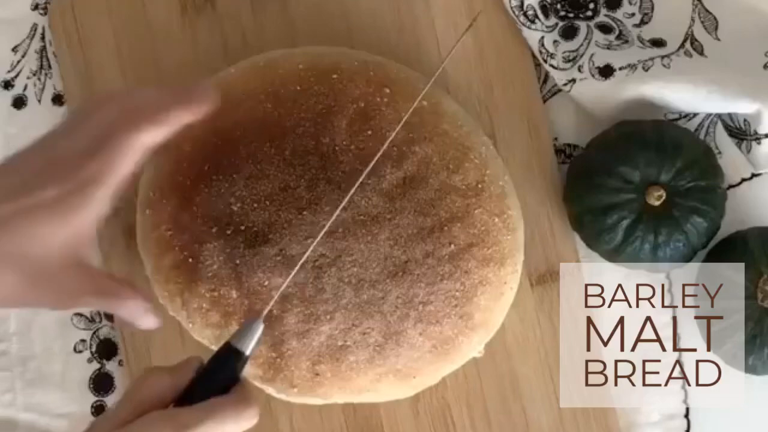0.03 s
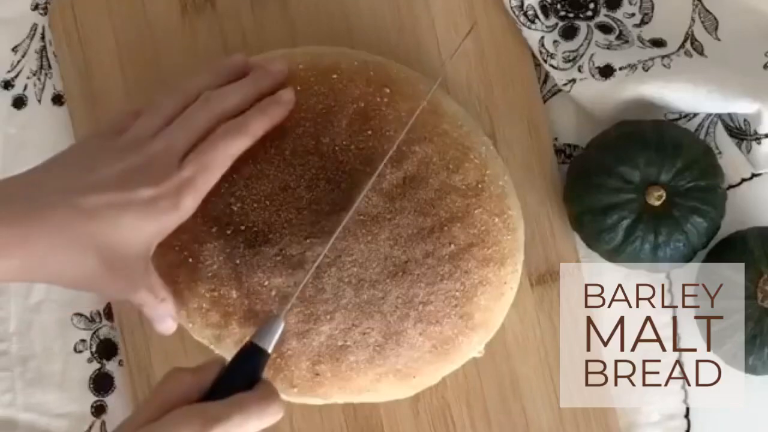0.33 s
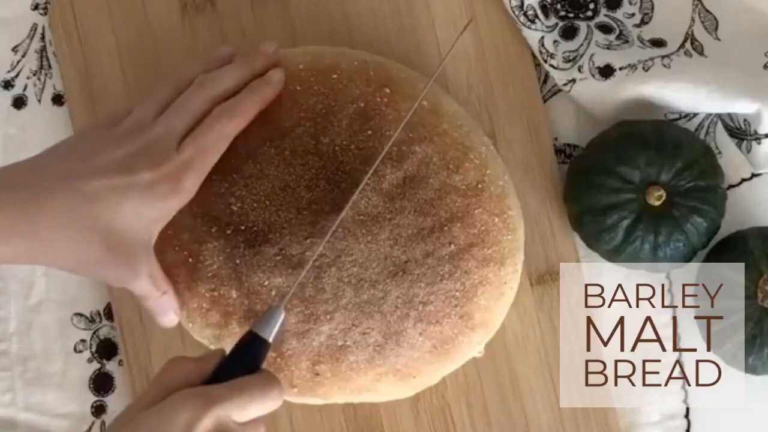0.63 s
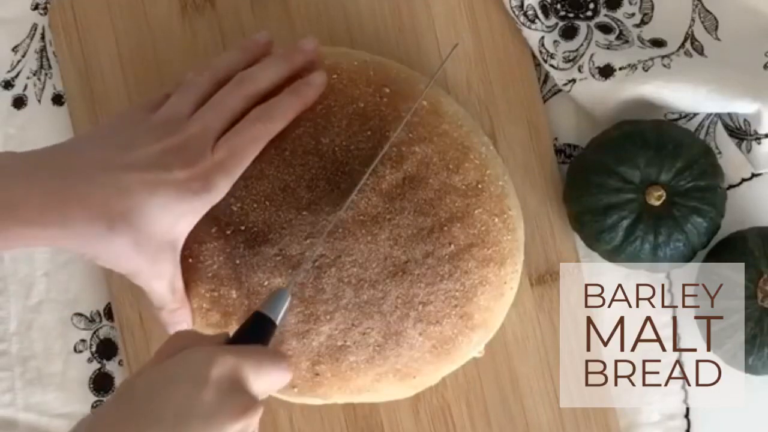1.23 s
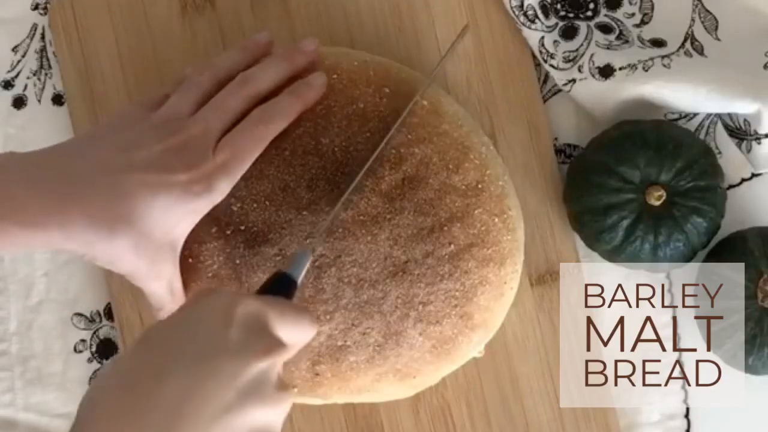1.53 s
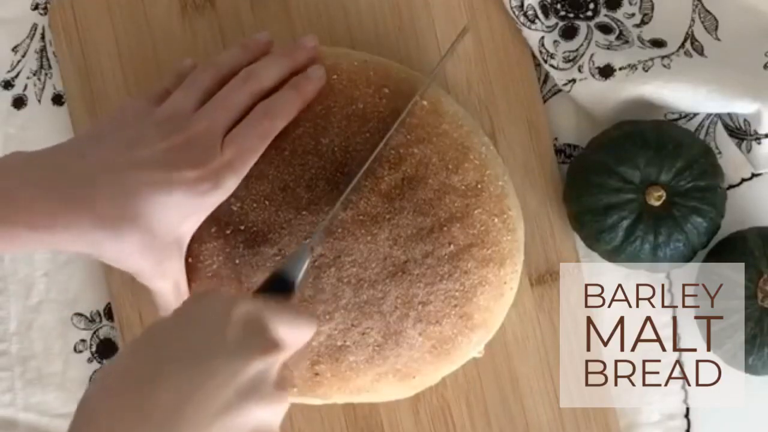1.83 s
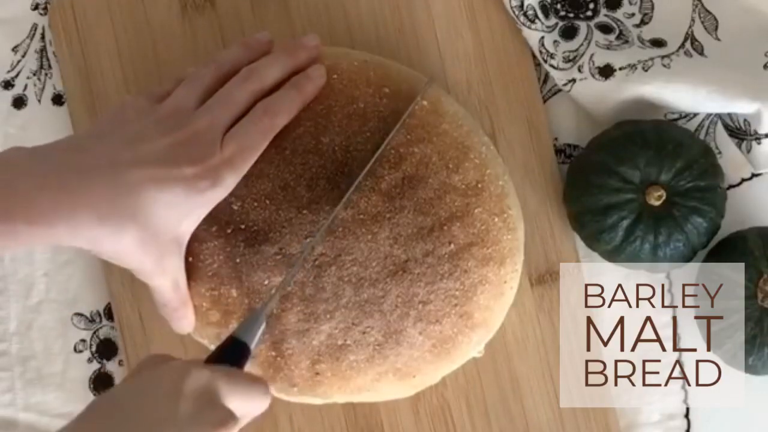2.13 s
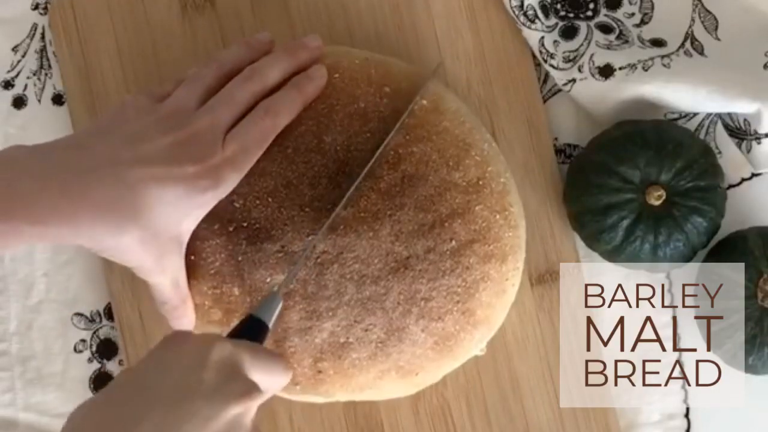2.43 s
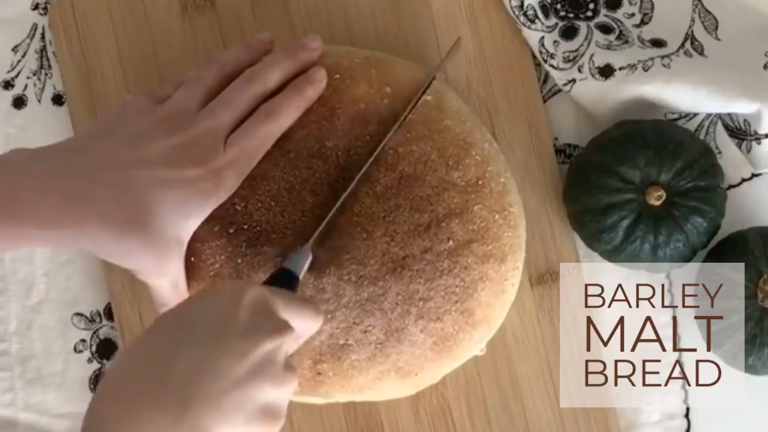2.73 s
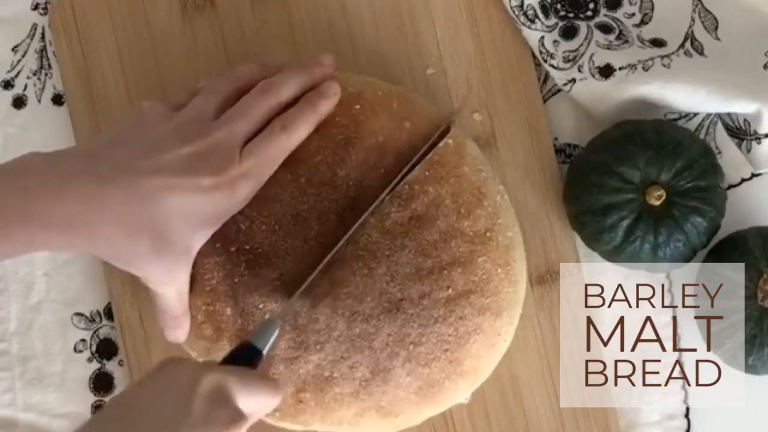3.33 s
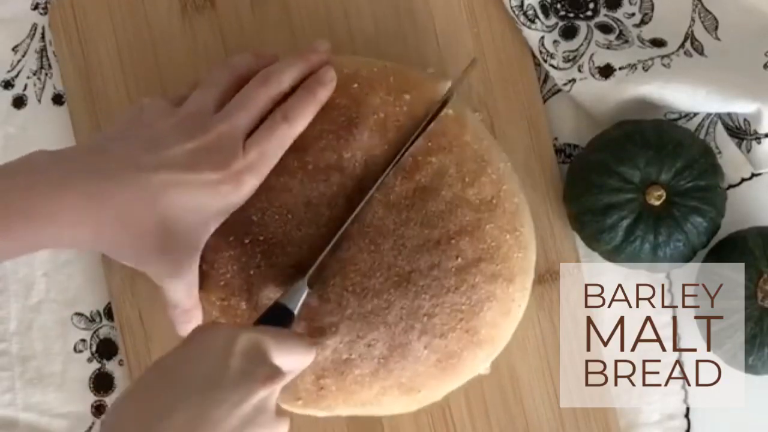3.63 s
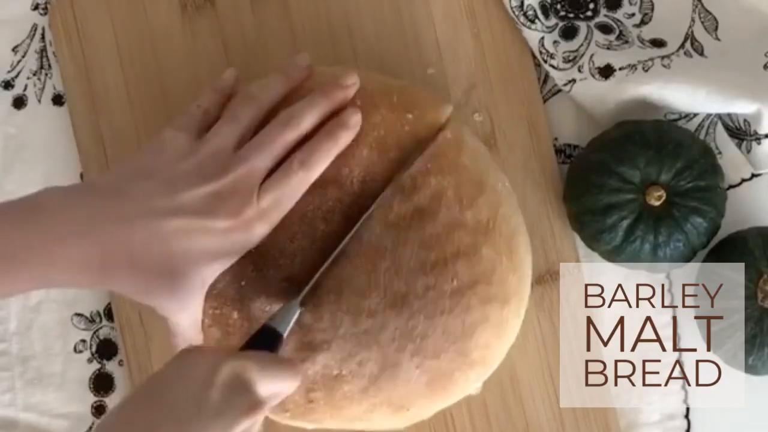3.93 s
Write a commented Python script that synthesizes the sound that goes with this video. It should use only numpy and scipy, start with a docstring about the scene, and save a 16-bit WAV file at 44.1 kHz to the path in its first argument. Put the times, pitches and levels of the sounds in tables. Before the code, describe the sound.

Close sawing of crusty bread in a quiet room starts with soft taps and scraping. The knife then rasps back and forth, snapping flakes of crust, while the loaf rumbles and knocks on the wooden board.

```python
"""A serrated knife saws a crusty round loaf on a wooden board in a quiet kitchen.
After a soft scrape, three pushes and three pulls grind the crust by brittle fracture: dense tiny cracks,
coarser crunches and the snaps of larger flakes. Stick-slip friction makes the blade groan in the first push.
Hand and blade tap the crust; the teeth tug the loaf, which rumbles and bumps the board.
The board rings in its normal modes, and a short reverberation follows over faint air noise."""
import sys
import numpy as np
from scipy import signal
from scipy.fft import rfft, irfft
from scipy.io import wavfile
from scipy.ndimage import uniform_filter1d

SR = 44100
rng = np.random.default_rng(int(sys.argv[2]) if len(sys.argv) > 2 else 0)


def put_to_file(sound):
    """Save the sound as 16-bit audio at rate SR, in the file named by the first command-line argument."""
    columns = np.atleast_2d(sound).T  # one column per channel
    safe = np.clip(columns, -1, 1)
    whole_steps = np.round(safe * 32767)
    wavfile.write(sys.argv[1], SR, whole_steps.astype(np.int16))


N = 176400

# Spectrum of the loaf shaken against the board. Each row: frequency in Hz, relative level in dB.
LOAF_SPECTRUM = [(30, -45.5), (65, -29.5), (90, -2), (115, -11), (150, -0.5), (210, 1), (280, -2.5),
                 (360, -8), (480, -19.5), (900, -21), (3000, -90)]
# Modes of the board and table, lowest first. Each row: frequency in Hz, gain in dB, T60 in seconds.
BOARD_MODES = [(90.9, 1.5, 0.55), (142.1, 8.5, 1), (343.6, 2, 0.61), (534, 6.5, 1), (657, 4, 0.22),
               (915, 0.5, 0.53), (1084, -6, 0.14), (1540, -6, 0.17), (1624, -1, 0.77)]
CATCH_HZ = 56.8  # bandwidth of the blade's uneven catching and slipping


def from_db(db):
    """Decibels to amplitude ratio."""
    return 10 ** (np.asarray(db) / 20)


def unit_rms(x):
    """Normalisation to rms 1."""
    return x / np.sqrt(np.mean(x ** 2) + 1e-20)


def unit_peak(x):
    """Normalisation to peak 1."""
    return x / (np.abs(x).max() + 1e-20)


def unit_burst(x):
    """Normalisation to the energy of two milliseconds at rms 1."""
    return x * np.sqrt(88 / (np.sum(x ** 2) + 1e-20))


def add(out, start_s, sound):
    """Superposition: a sound joins the mix at its start time."""
    start = int(start_s * SR)
    out[start:start + len(sound)] += sound[:max(N - start, 0)]


def response(spectrum, size=8192):
    """Minimum-phase impulse response of a body with this spectrum, by folding the cepstrum."""
    hz, db = np.transpose(spectrum)
    grid_hz = np.maximum(np.arange(size // 2 + 1) * SR / size, 1)
    magnitude = from_db(np.interp(np.log(grid_hz), np.log(hz), db))
    cepstrum = irfft(np.log(magnitude))
    cepstrum[1:size // 2] *= 2
    cepstrum[size // 2 + 1:] = 0
    return irfft(np.exp(rfft(cepstrum)))


def through(x, impulse_response):
    """Convolution passes a sound through a linear system."""
    return signal.fftconvolve(x, impulse_response)[:len(x)]


def resonate(x, hz, width_hz):
    """A damped resonator with gain 1 at its peak."""
    radius = np.exp(-np.pi * width_hz / SR)
    zeros = np.array([1, 0, -1]) * (1 - radius ** 2) / 2
    poles = [1, -2 * radius * np.cos(2 * np.pi * hz / SR), radius ** 2]
    return signal.lfilter(zeros, poles, x + 1e-18)


def drift(width_hz):
    """Smooth random fluctuation: low-passed noise at rms 1."""
    pole = np.exp(-2 * np.pi * width_hz / SR)
    smooth = signal.lfilter([1], [1, -2 * pole, pole ** 2], rng.standard_normal(N + SR))
    return unit_rms(smooth[SR:])


def grains(spectrum, per_s, spread_db):
    """Shot noise at rms 1: random impulses excite a body; a spread makes a few of them larger."""
    sizes = from_db(spread_db * np.minimum(rng.exponential(1, N), 5))
    signs = rng.choice([-1, 1], N)
    occurs = rng.random(N) < per_s / SR
    return unit_rms(through(sizes * signs * occurs, response(spectrum)))


def impacts(contacts, spectrum):
    """Impulsive excitation: each brief contact sounds the body's impulse response."""
    out, knock = np.zeros(N), unit_peak(response(spectrum))
    for start_s, peak_db in contacts:
        add(out, start_s, from_db(peak_db) * knock)
    return out


def air():
    """Ambient noise: faint, stationary and strongest in the bass."""
    # Spectrum of the still room. Each row: frequency in Hz, relative level in dB.
    spectrum = [(15, -37.5), (25, 3.5), (80, 4.5), (441, -10), (689, -16.5), (2380, -23.5), (4960, -32),
                (10000, -37.5)]
    return from_db(-65.5) * unit_rms(through(rng.standard_normal(N), response(spectrum)))


def sawing():
    """Brittle fracture: teeth rasp and crumble the crust and tug the loaf; catching modulates all three."""
    # Stroke envelopes. Each row: time in seconds, relative levels of rasp, crumble and rumble in dB.
    first_scrape = [(0.2, -87, -79, -93), (0.26, -82, -81, -80), (0.5, -79.5, -76.5, -70.5),
                    (0.74, -79.5, -76.5, -85), (0.86, -76.5, -74.5, -75), (0.89, -77, -80, -77),
                    (1.0, -77.5, -77, -77), (1.3, -79.5, -80.5, -69)]
    push_1 = [(1.38, -69.5, -75.5, -62), (1.43, -69, -76, -56.5), (1.47, -52.5, -66, -48.5),
              (1.544, -61.5, -70, -53), (1.578, -50.5, -58, -46), (1.675, -61.5, -71, -52),
              (1.698, -53, -54.5, -45), (1.735, -69.5, -87, -56), (1.79, -71.5, -75, -70)]
    pull_1 = [(1.814, -52.5, -69, -45), (1.834, -47.5, -60, -48.5), (1.962, -48.5, -56.5, -44.5),
              (2.04, -61.5, -71, -56), (2.12, -74, -80, -61)]
    push_2 = [(2.21, -69.5, -75, -58.5), (2.256, -54, -74, -47), (2.29, -61, -74, -50.5),
              (2.33, -56.5, -62.5, -50.5), (2.45, -61.5, -70, -53), (2.5, -53.5, -58.5, -45.5),
              (2.57, -47, -55.5, -39.5), (2.69, -45.5, -51.5, -41), (2.749, -56, -63.5, -57),
              (2.81, -69, -75.5, -63)]
    pull_2 = [(2.85, -60.5, -69, -55), (2.9, -54.5, -57.5, -65), (2.965, -49, -54, -43.5),
              (3.06, -54, -61.5, -52.5), (3.14, -71.5, -78.5, -66)]
    push_3 = [(3.21, -66, -72.5, -70.5), (3.29, -58.5, -65.5, -56.5), (3.37, -52.5, -56, -56),
              (3.51, -54.5, -58.5, -51), (3.612, -54, -60, -54), (3.68, -61, -66, -60),
              (3.75, -60.5, -62, -62.5), (3.84, -76, -77, -63.5)]
    pull_3 = [(3.89, -58, -71.5, -61), (3.94, -58, -64, -60), (4.0, -51, -63.5, -48.5)]
    # Spectra of the coarser and finer fractures. Each row: frequency in Hz, relative level in dB.
    rasp_spectrum = [(200, -20.5), (400, -3.5), (650, -3.5), (850, -5), (1150, 0.5), (1600, -1), (2000, -4),
                     (2500, -4), (3700, -9), (5000, -17.5), (7000, -17.5), (14000, -33)]
    crumble_spectrum = [(2000, 0), (4000, 3.5), (7300, -1), (8800, 2.5), (10400, -4), (12000, 0.5),
                        (13400, 0.5), (15000, -9)]
    times, *levels = np.vstack([first_scrape, push_1, pull_1, push_2, pull_2, push_3, pull_3]).T
    rasp_db, crumble_db, rumble_db = [np.interp(np.arange(N) / SR, times, db) for db in levels]
    rasp = from_db(rasp_db) * grains(rasp_spectrum, per_s=1800, spread_db=1.5)
    crumble = from_db(crumble_db + 1) * grains(crumble_spectrum, per_s=8000, spread_db=0)
    rumble = from_db(rumble_db - 3.5) * grains(LOAF_SPECTRUM, per_s=600, spread_db=2.03)
    catching = from_db(1.4 * drift(CATCH_HZ))
    return (rasp + crumble + rumble) * catching


def board(force):
    """Modal resonance: the board and table ring on after whatever shakes them."""
    return sum(from_db(db) * resonate(force, hz, width_hz=np.log(1000) / (np.pi * t60))
               for hz, db, t60 in BOARD_MODES)


def kitchen(sound):
    """Reverberation: a short diffuse tail with little bass, whose treble decays first."""
    low_t60_s, treble_t60_s = 0.49, 0.19
    t, white = np.arange(SR) / SR, rng.standard_normal(SR)
    low = signal.sosfilt(signal.butter(1, 710, fs=SR, output="sos"), white)
    tail = low * from_db(-60 * t / low_t60_s) + (white - low) * from_db(-60 * t / treble_t60_s)
    tail = signal.sosfilt(signal.butter(1, 440, "high", fs=SR, output="sos"), tail)
    return from_db(-7.5) * through(sound, tail / np.linalg.norm(tail))


def palm():
    """Forced vibration: the palm lands and presses on the loaf, shaking the board's lowest mode."""
    start_s, end_s, peak_db = 0.247, 0.5, -54
    t, hz = np.arange(N) / SR, BOARD_MODES[0][0]
    pressing = rng.standard_normal(N) * ((t > start_s) & (t < end_s))
    thud = resonate(resonate(pressing, hz, width_hz=56), hz, width_hz=56)
    return from_db(peak_db) * unit_peak(thud)


def taps():
    """Light impacts: the hand and the blade settle on the crust."""
    # Contacts with the crust. Each row: start in seconds, peak level in dB.
    contacts = [(0.248, -42.5), (0.323, -53), (0.442, -55), (1.332, -48)]
    # Spectrum of the tapped crust. Each row: frequency in Hz, relative level in dB.
    spectrum = [(200, -14), (1100, 0), (2300, -5), (4800, -18), (14000, -23.5)]
    return impacts(contacts, spectrum)


def bumps():
    """Dull impacts: the loaf knocks against the board."""
    # Contacts with the board. Each row: start in seconds, peak level in dB.
    contacts = [(0.249, -51.5), (0.443, -57), (2.251, -43), (2.569, -28.5), (2.685, -27.5), (2.691, -46),
                (2.942, -36.5), (3.528, -41.5), (3.614, -41), (3.787, -49)]
    return impacts(contacts, LOAF_SPECTRUM)


def crunches():
    """Fracture cascades: patches of crust collapse under the blade in runs that swell and die."""
    # Collapsing patches. Each row: start in seconds, length in seconds, relative level in dB.
    patches = [(0.869, 0.082, -69.5), (3.4874, 0.029, -44.5), (3.518, 0.01, -45), (3.599, 0.02, -53)]
    # Spectrum of their coarse fractures. Each row: frequency in Hz, relative level in dB.
    spectrum = [(300, -24), (700, -6.5), (1100, -7.5), (1650, 0), (2100, -6.5), (2600, -10), (3600, -13.5),
                (5500, -14), (14000, -27)]
    t, swell = np.arange(N) / SR, np.zeros(N)
    for start_s, length_s, db in patches:
        progress = np.clip((t - start_s) / length_s, 0, 1)
        swell += from_db(db + 2.5) * np.sqrt(np.abs(np.sin(np.pi * progress)))
    return swell * grains(spectrum, per_s=2500, spread_db=1.8)


def groan():
    """Stick-slip friction of the blade's flat in the cut: a low, unsteady tone with a weak octave."""
    # Course of the groan. Each row: time in seconds, mean pitch in Hz, level in dB.
    course = [(1.5, 219, -55.5), (1.561, 210.8, -54), (1.585, 162.3, -46.5), (1.614, 138.3, -61.5),
              (1.66, 205.5, -54.5), (1.725, 214, -49.5)]
    jitter, octave_db = 0.0502, -14.5
    t = np.arange(N) / SR
    times, hz, db = np.transpose(course)
    pitch_hz = np.interp(t, times, hz) * (1 + jitter * drift(CATCH_HZ))
    phase = 2 * np.pi * np.cumsum(pitch_hz) / SR
    tone = unit_rms(np.sin(phase) + from_db(octave_db) * np.sin(2 * phase))
    gate = uniform_filter1d(1.0 * ((t > times[0]) & (t < times[-1])), size=441)  # 10 ms fades
    return from_db(np.interp(t, times, db)) * gate * tone


def snaps(size=2048):
    """Brittle fracture: a crack clicks open, splinters and sheds crumbs; the freed flake rings briefly."""
    # Snapping flakes. Each row: start in seconds, crack level in dB, ring level in dB, ring pitch in Hz.
    flakes = [(1.8355, -50, -62, 8500), (2.2586, -48.5, -64, 8800), (2.338, -79, -51.5, 11300),
              (2.392, -46.5, -57, 8500), (2.482, -42.5, -46, 11300), (2.546, -34, -62, 8500),
              (2.62, -39, -44.5, 8750), (2.6574, -37.5, -59, 8000), (2.9414, -34.5, -63, 8900),
              (2.962, -40.5, -37.5, 13700), (3.238, -48.5, -53.5, 11400), (3.274, -45.5, -52.5, 8270),
              (3.314, -46, -68, 9000), (3.342, -39, -55, 12100), (3.362, -42, -46, 9500),
              (3.3755, -41.5, -34, 9400), (3.462, -41, -63, 5300), (3.5593, -31.5, -37, 9300),
              (3.589, -49, -45.5, 11000), (3.7045, -45.5, -73, 9050), (3.7155, -56, -66, 8950),
              (3.9593, -44, -48, 9500)]
    # Spectrum of the cracking crust. Each row: frequency in Hz, relative level in dB.
    spectrum = [(500, -18), (1000, -1.5), (1700, 3), (2200, -3), (2900, -2), (4200, -5), (5600, -5.5),
                (7000, -14.5), (14000, -15)]
    splinter_decay_s, flake_decay_s, crumb_decay_s = 0.0013, 0.00024, 0.0057
    out, t, crust = np.zeros(N), np.arange(size) / SR, response(spectrum)
    click = t == 0
    crumbs = 0.049 * np.exp(-t / crumb_decay_s)
    for start_s, crack_db, ring_db, hz in flakes:
        splinters = 0.59 * rng.standard_normal(size) * (np.exp(-t / splinter_decay_s) + crumbs)
        crack = unit_burst(through(click + splinters, crust))
        release = rng.standard_normal(size) * (np.exp(-t / flake_decay_s) + crumbs)
        ring = unit_burst(resonate(release, hz, width_hz=1600))
        add(out, start_s, from_db(crack_db) * crack + from_db(ring_db) * ring)
    return out


def boom():
    """Free decay: the blade breaks through, and the hardest bump leaves the board's main mode ringing."""
    start_s, peak_db, t60_s = 2.685, -40, 0.42
    bump = impacts([(start_s, 0)], LOAF_SPECTRUM)
    ring = resonate(bump, hz=BOARD_MODES[1][0], width_hz=np.log(1000) / (np.pi * t60_s))
    return from_db(peak_db) * unit_peak(ring)


def scene():
    """Superposition of the cutting, the board's ringing, the reverberation and the air, in mono."""
    cutting = sawing() + taps() + bumps() + crunches()
    flakes = snaps()
    ringing = board(cutting + flakes) + palm() + boom()
    friction = groan()
    room = kitchen(cutting + friction + from_db(-4) * flakes)  # snaps reach the room less than sawing
    return (cutting + friction + flakes + ringing + room + air())[None]


def record(dry):
    """Band limiting: a steep elliptic low-pass removes the highest treble."""
    cutoff_hz = 13950
    return signal.sosfilt(signal.ellip(12, .2, 70, cutoff_hz, fs=SR, output="sos"), dry)


dry = scene()
out = record(dry)
put_to_file(out)
```